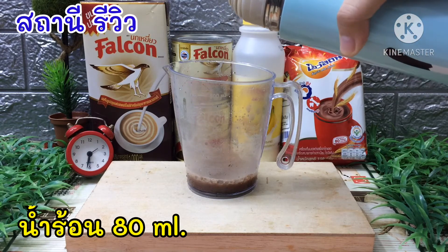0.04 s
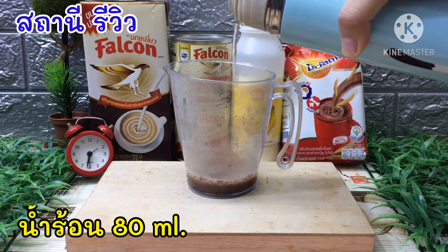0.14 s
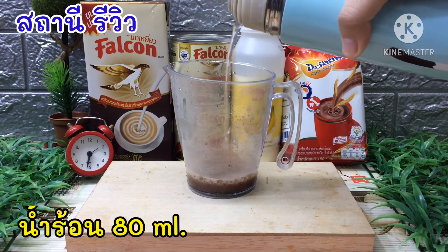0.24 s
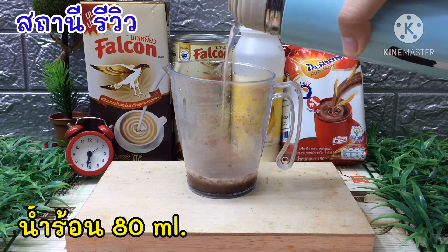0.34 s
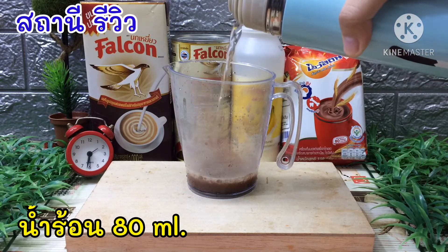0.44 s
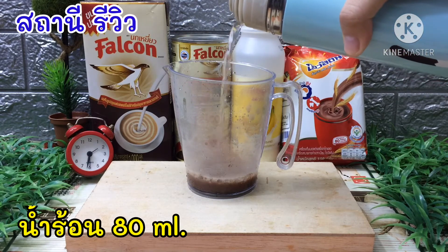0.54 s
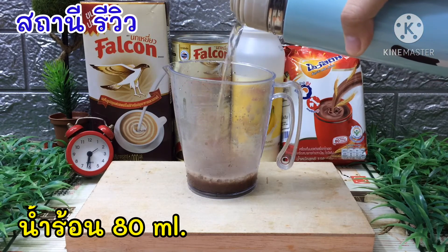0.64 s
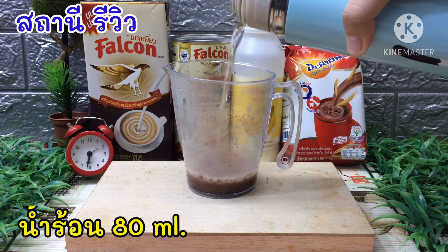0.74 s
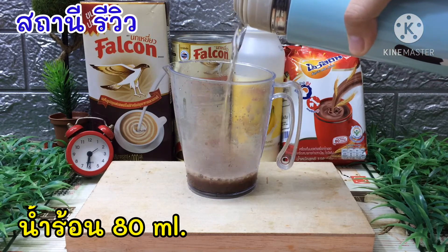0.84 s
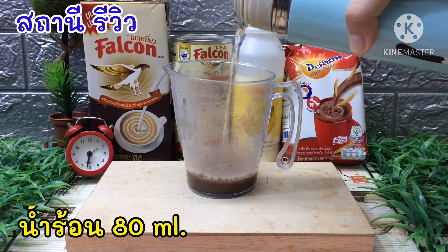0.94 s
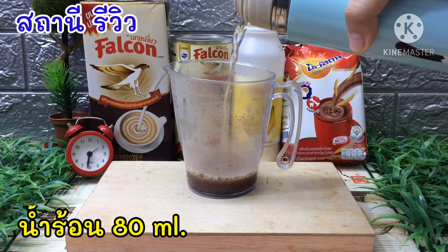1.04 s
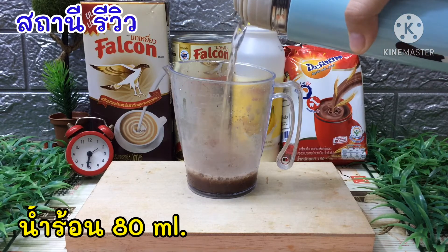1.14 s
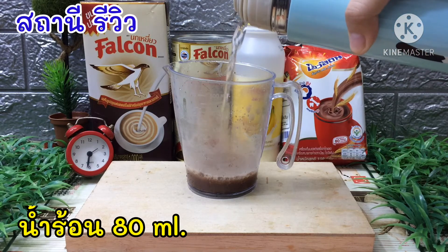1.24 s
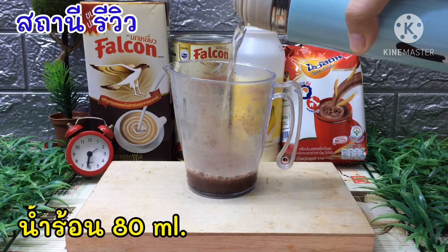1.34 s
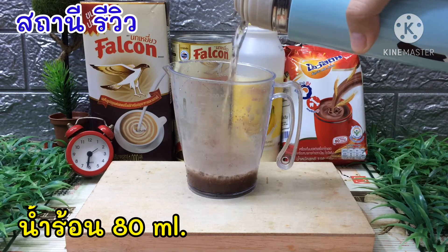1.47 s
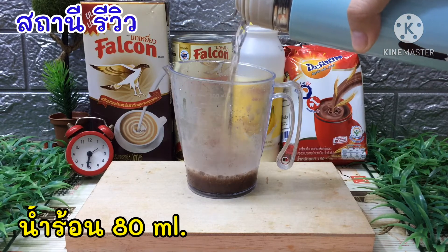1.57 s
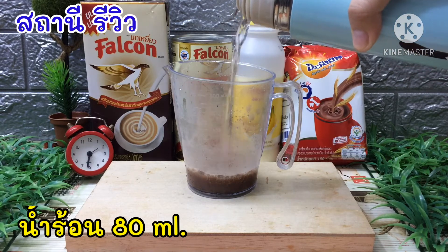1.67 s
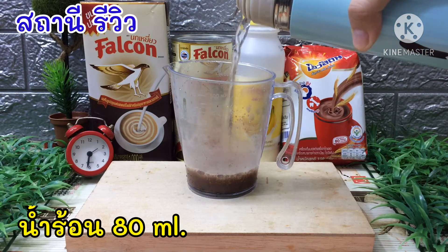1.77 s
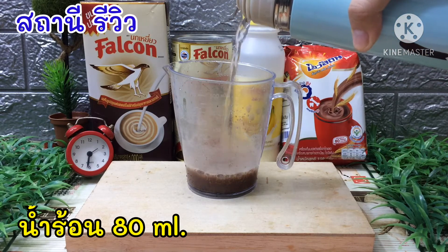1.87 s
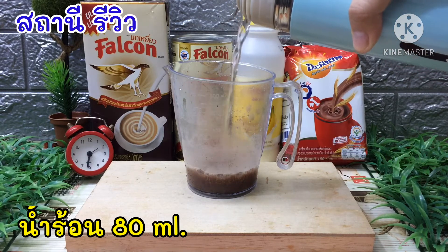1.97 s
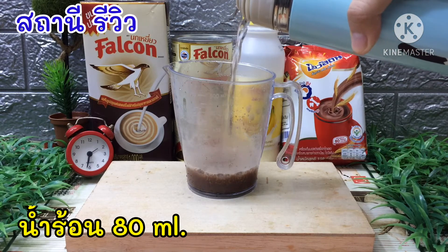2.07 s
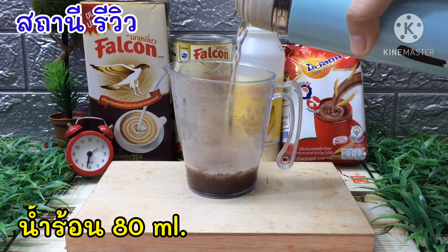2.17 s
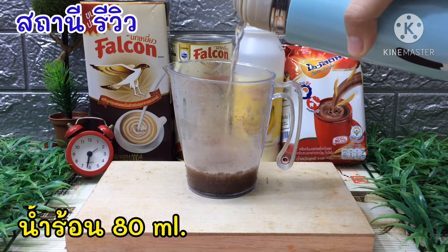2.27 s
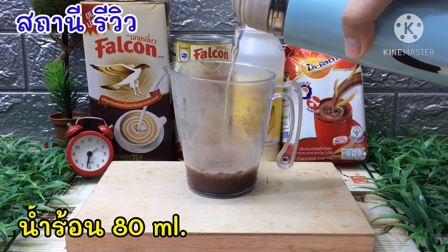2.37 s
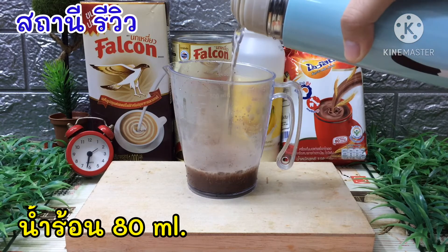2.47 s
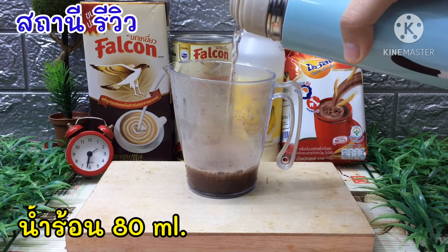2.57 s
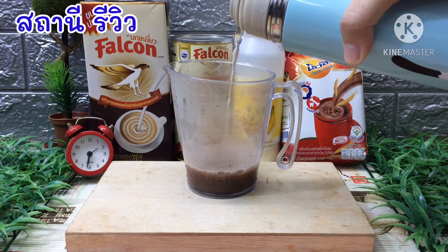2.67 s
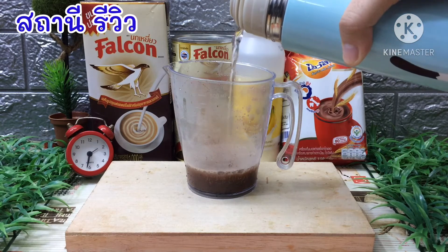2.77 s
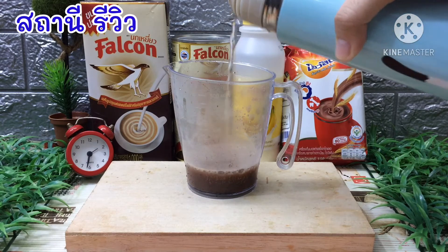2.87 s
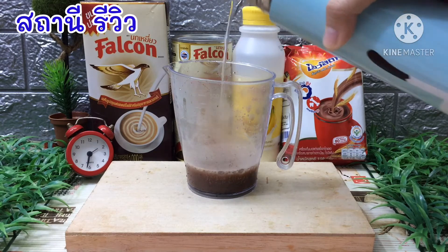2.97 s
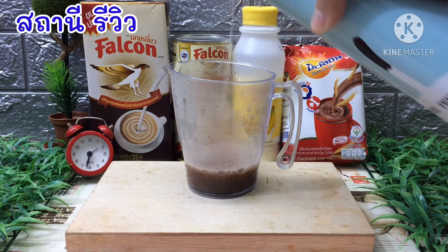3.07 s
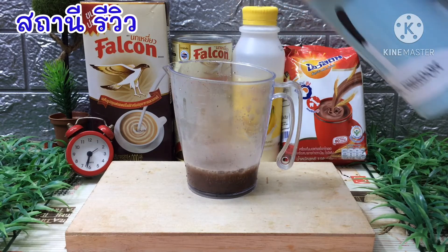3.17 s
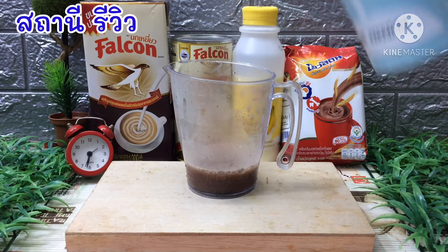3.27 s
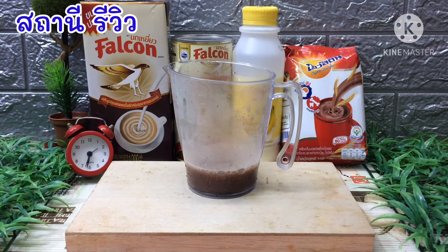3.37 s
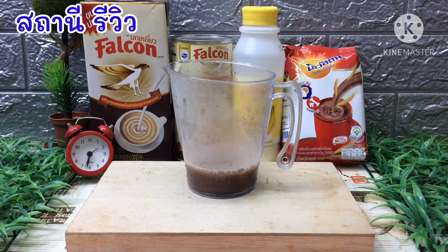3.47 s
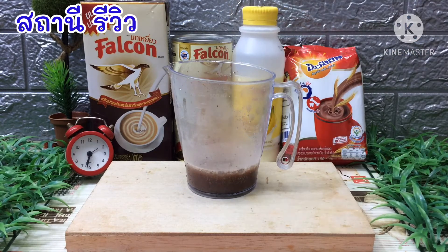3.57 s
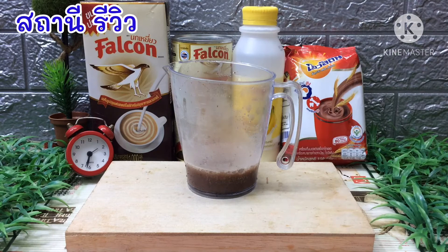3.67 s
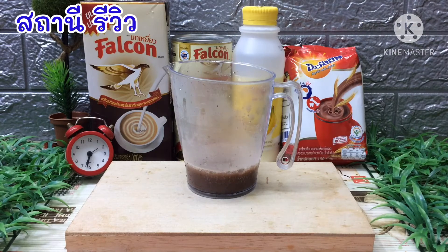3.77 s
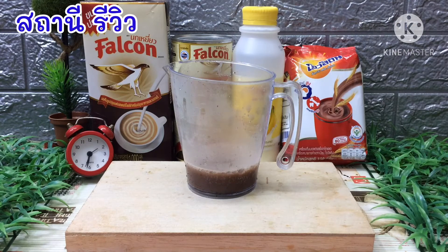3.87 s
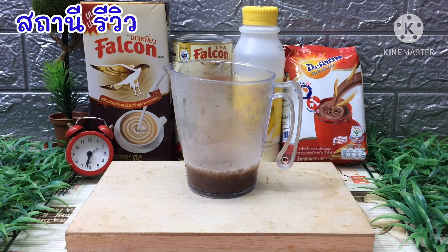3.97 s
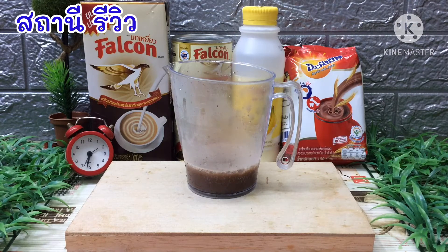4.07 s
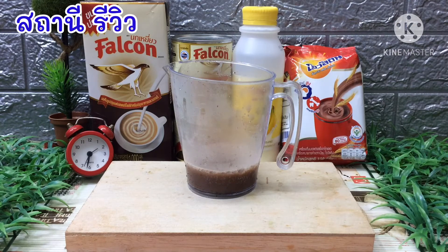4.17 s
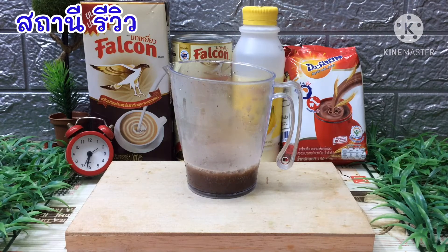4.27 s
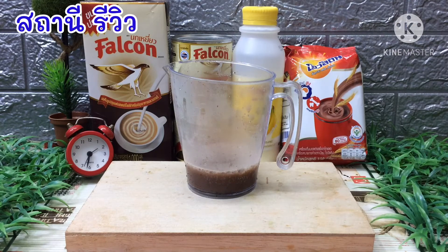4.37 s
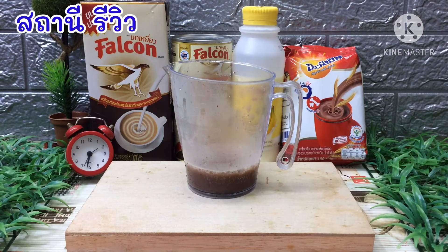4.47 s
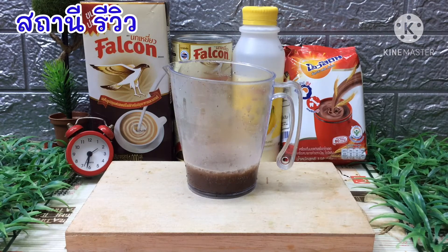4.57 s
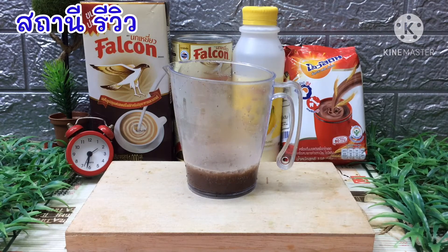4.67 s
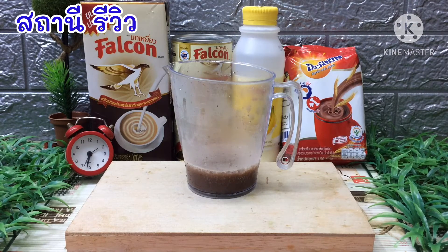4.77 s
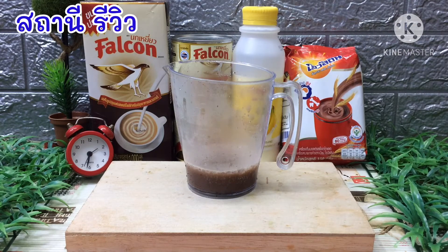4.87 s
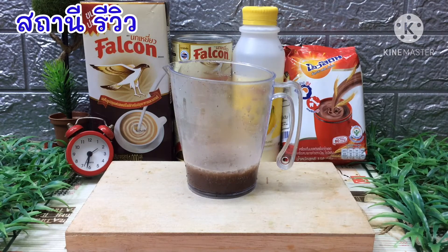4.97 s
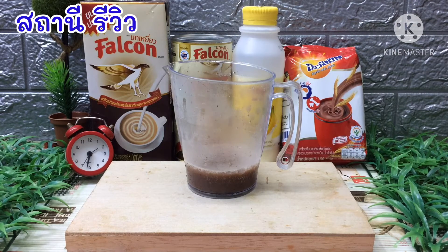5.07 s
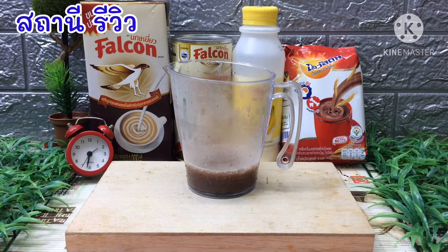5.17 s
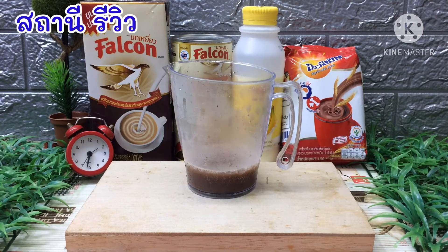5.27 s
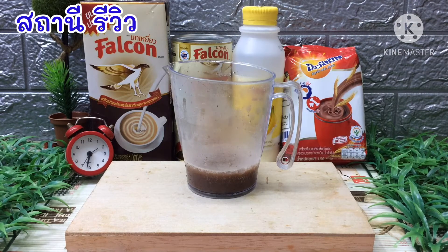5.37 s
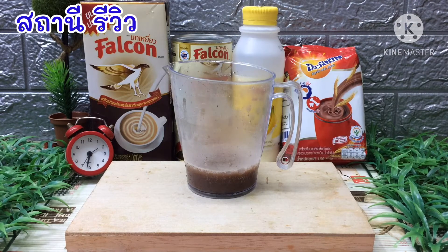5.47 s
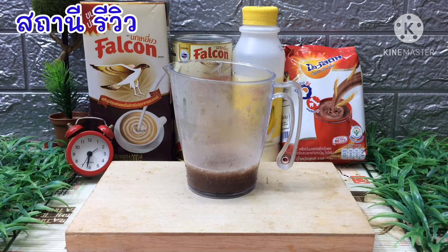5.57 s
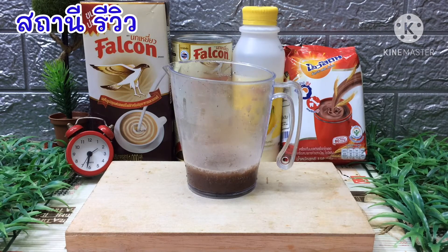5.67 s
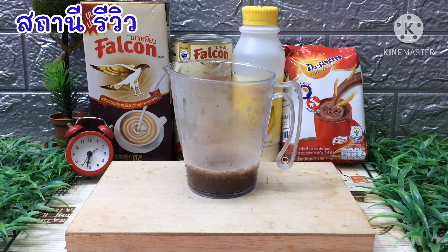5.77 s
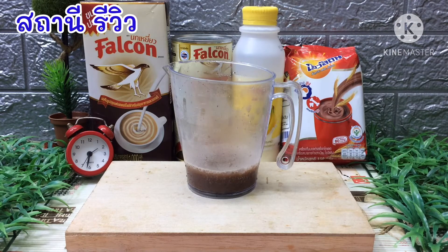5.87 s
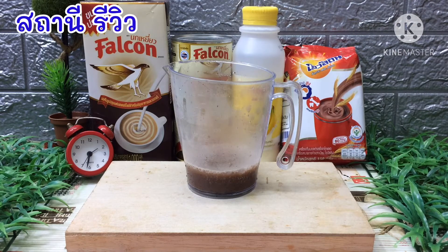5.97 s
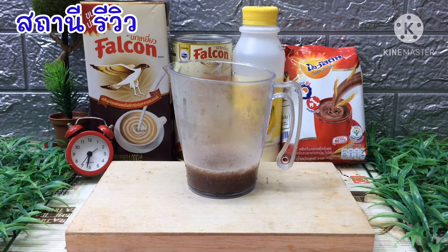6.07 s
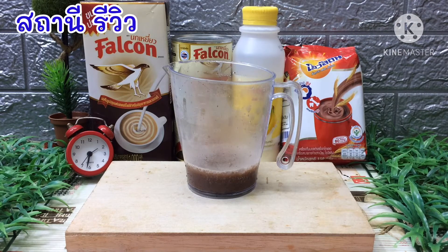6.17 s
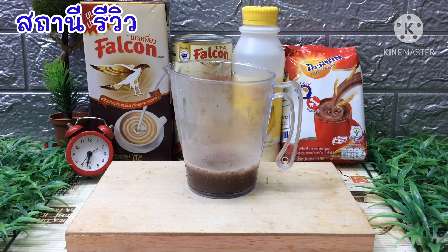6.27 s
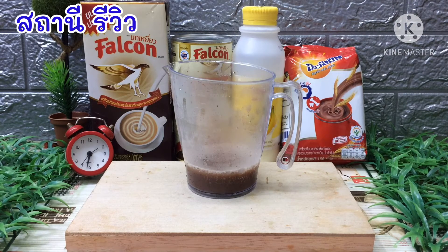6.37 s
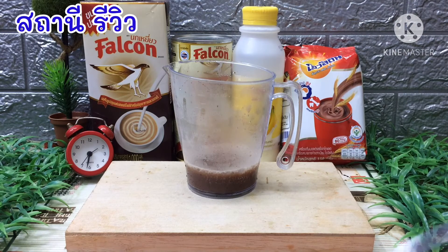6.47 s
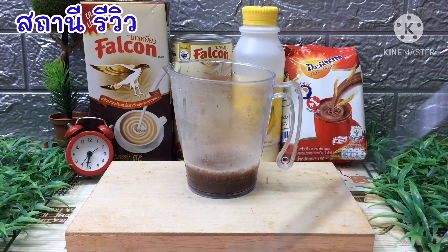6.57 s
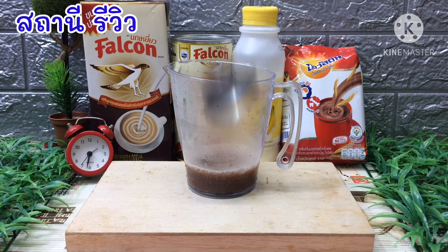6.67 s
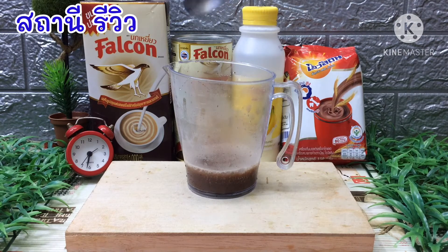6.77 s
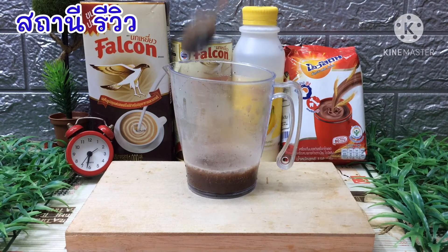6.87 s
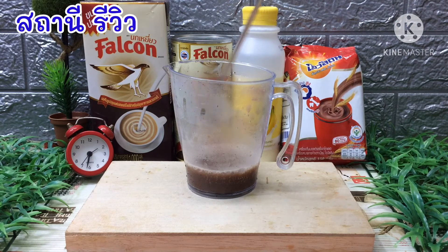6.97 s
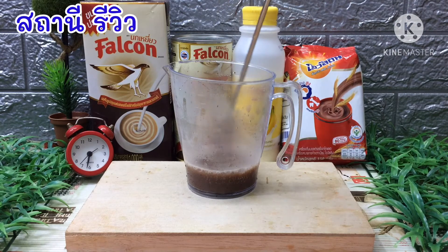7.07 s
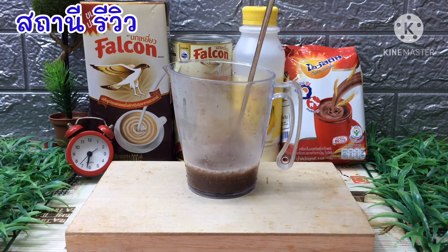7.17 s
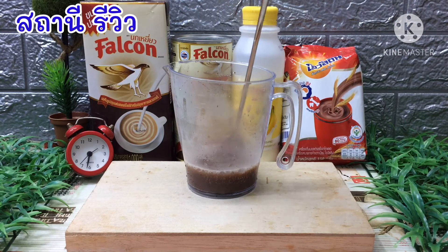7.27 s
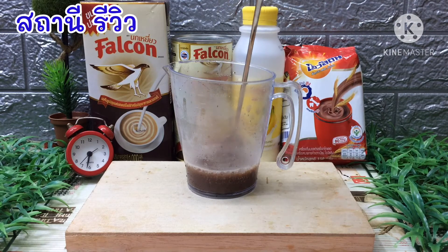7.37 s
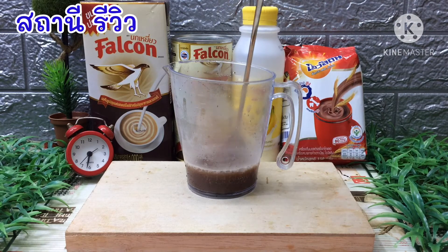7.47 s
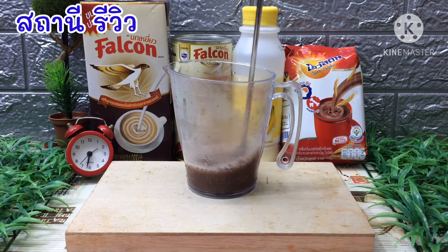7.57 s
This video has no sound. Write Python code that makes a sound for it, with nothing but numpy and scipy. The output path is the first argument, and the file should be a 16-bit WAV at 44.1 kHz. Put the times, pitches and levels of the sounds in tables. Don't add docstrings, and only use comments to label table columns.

```python
import sys
import numpy as np
from scipy import signal
from scipy.fft import rfft, irfft, next_fast_len
from scipy.io import wavfile
from scipy.ndimage import uniform_filter1d, map_coordinates

SR = 44100
rng = np.random.default_rng(int(sys.argv[2]) if len(sys.argv) > 2 else 0)


def digitize_waveform(pressure):
    field = np.atleast_2d(pressure).T
    bounded = np.clip(field, -1, 1)
    quanta = np.round(bounded * 32767).astype(np.int16)
    wavfile.write(sys.argv[1], SR, quanta)


def nominal_scale(level):
    x = np.asarray(level, float) / 20
    return 10 ** x


N = 336394


def unit(x):
    return x / np.sqrt(np.mean(x ** 2) + 1e-20)


def along(points, hz):
    f, v = np.transpose(points)
    return np.interp(np.log(hz + 1), np.log(f + 1), v)


def wobble(rate):
    knots = rng.standard_normal(int(N * rate / SR) + 4)
    return map_coordinates(knots, [np.arange(N) * rate / SR])


def filtered(x, response):
    m = next_fast_len(len(x) + 8192)
    return irfft(rfft(x, m) * response(np.fft.rfftfreq(m, 1 / SR)), m)[:len(x)]


def noise(spectrum, size=N):
    return unit(filtered(rng.standard_normal(size), lambda hz: nominal_scale(along(spectrum, hz))))


def resonant(x, modes):
    def response(f):
        total = 0
        for k, (centre, width, db) in enumerate(modes):
            total = total + (-1) ** k * nominal_scale(db) * 1j * f * width / (centre ** 2 - f ** 2 + 1j * f * width)
        return total
    return filtered(x, response)


def blips(s, db, hz, cycles, rise, size=900):
    turns = hz[:, None] * np.arange(size) / SR
    life = turns / cycles[:, None]
    tone = np.sin(2 * np.pi * turns * (1 + rise * np.minimum(life, 3)))
    rows = nominal_scale(db)[:, None] * tone * np.exp(-life) * (1 - np.exp(-2 * turns))
    at = (s * SR).astype(int)[:, None] + np.arange(size)
    return np.bincount(at.ravel(), rows.ravel(), N + SR)[:N]


def swarm(count, hz, spread, cycles, scatter_db, rise=0.023):
    pour_s = 3.6
    u, v, w = rng.random((count, 3)).T
    pitch = np.clip(hz * np.exp(spread * rng.standard_normal(count)), 200, 15000)
    db = scatter_db * np.minimum(-np.log(1 - v), 3)
    grains = blips(pour_s * u, db, pitch, cycles * (0.5 + w), rise=rise, size=400)
    return grains / np.sqrt(np.mean(grains[:int(pour_s * SR)] ** 2))


def gush(events, db, t60):
    kicks = np.bincount((events * SR).astype(int), nominal_scale(db), N)
    return signal.lfilter([1], [1, -nominal_scale(-60 / t60 / SR)], kicks)


def patchy(x, patchy_db):
    z = signal.stft(x, nperseg=256)[2]
    field = uniform_filter1d(rng.standard_normal(z.shape), size=8, axis=0)
    field = uniform_filter1d(field, size=8, axis=1)
    return signal.istft(z * nominal_scale(patchy_db * unit(field)), nperseg=256)[1][:N]


def dribble(rows, modes, weaker_db, after_db):
    s, db, hz, _ = np.transpose(rows)
    u, v, w = rng.random((len(s), 3)).T
    late = s + 0.013 + 0.006 * u
    weak = (db + db.mean()) / 2 + weaker_db + 3 * (2 * w - 1)
    pitch = np.array(modes)[(v * len(modes)).astype(int), 0]
    return np.hstack([np.transpose(rows), [late, weak, pitch, 0 * s + after_db]])


# (time [s], strength [dB])
FLOW = [(.28, -64), (.38, -49.5), (.62, -45.5), (1.8, -38.5), (2.2, -47), (2.9, -45.5), (3.19, -44.5),
        (3.34, -63), (3.45, -97)]


def pour():
    flow_s, flow_db = np.transpose(FLOW)
    gurgle_db = np.interp(np.arange(N) / SR, flow_s, flow_db, -120, -120)
    slapping, spatter = slaps(gurgle_db)
    bubbling = bubbles(gurgle_db - 14)
    spray_db = -59.5 + 0.86 * (gurgle_db + 44)
    return slapping + bubbling + spray(spray_db, spatter)


# (time [s], peak level [dB], pitch of the cavity [Hz], gush that follows [dB])
SLUGS = [(0.402, -20.5, 710, -12.5), (0.495, -16.5, 716, -12), (0.592, -18, 716, -23), (0.665, -25, 635, 1),
         (0.883, -19.5, 716, 0), (1.05, -18, 740, -13), (1.1185, -24.5, 760, 0.5), (1.169, -22.5, 600, -1),
         (1.331, -17, 720, -7.5), (1.4055, -12.5, 695, -9.5), (1.487, -19.5, 553, -14),
         (1.677, -29.5, 740, 11.5), (1.873, -18.5, 740, -1), (1.911, -19, 1080, -6.5),
         (1.9375, -15, 754, -10), (2.028, -13.5, 1047, -31), (2.09, -15, 754, -5), (2.14, -19, 500, 2.5),
         (2.243, -18, 563, 1), (2.285, -19, 465, 0), (2.32, -17, 490, -21), (2.41, -16.5, 1150, -6.5),
         (2.574, -21.5, 760, 0), (2.6625, -17, 774, -1.5), (2.72, -12.5, 760, -22), (2.85, -19, 754, 1.5),
         (2.946, -14.5, 790, -7.5), (3.045, -22, 760, -4), (3.084, -10.5, 760, -9), (3.119, -35, 560, -9),
         (0.537, -17, 665, -14), (0.754, -23.5, 600, -16), (0.807, -20.5, 624, -31), (0.959, -24, 611, -25),
         (0.996, -24.5, 766, 0), (1.267, -21.5, 725, -11), (1.385, -34, 538, -23), (1.525, -33, 760, 2),
         (1.584, -42, 727, -24), (1.787, -26, 760, -22), (1.849, -18.5, 1005, -28),
         (2.153, -13, 553, -11.5), (2.217, -25, 517, -9), (2.425, -17, 800, -4.5), (2.463, -32, 590, -12),
         (2.525, -29, 534, -2), (2.675, -19, 790, -19), (2.818, -21, 754, -12), (2.921, -29, 770, -16),
         (3.063, -26, 815, -21)]
# (frequency [Hz], width [Hz], level [dB])
JUG_AIR = [(199, 22, -9), (312, 34, -7.5), (447, 100, -6), (560, 64, 1.5), (760, 67, 1), (1033, 220, -6.5),
           (1288, 170, -10), (1850, 65, -41), (2300, 450, -6.5)]


def slaps(gurgle_db):
    s, db, hz, gush_db = dribble(SLUGS, modes=JUG_AIR[3:6], weaker_db=-10.5, after_db=-42)
    slap = blips(s, db, 0 * s + 1300, 0 * s + 0.5, rise=0, size=200)
    cavity = blips(s, db, hz, 2 + 3 * rng.random(len(s)), rise=0.014, size=1600)
    slugs = nominal_scale(12.0) * resonant(slap, JUG_AIR) + nominal_scale(-13.5) * slap + nominal_scale(-6.5) * cavity
    grains = swarm(count=2000, hz=976, spread=0.552, cycles=1.27, scatter_db=1.0)
    churn = nominal_scale(gurgle_db - 7.0) + gush(s, db + gush_db - 18.5, t60=0.29)
    gurgle = churn * unit(resonant(grains, JUG_AIR))
    spatter = gush(s, db - 38.0, t60=0.022)
    return slugs + gurgle, spatter


# (time [s], peak level [dB], pitch [Hz], froth that follows [dB])
BUBBLES = [(0.3836, -36.5, 2300, -10.5), (0.5114, -27, 1870, -14), (0.5742, -25, 1870, -13),
           (0.7184, -25.5, 2600, -9), (0.883, -23, 1970, -18), (0.9329, -23.5, 2270, -15.5),
           (1.1185, -24, 2270, -22.5), (1.1344, -12.5, 2270, -23), (1.1948, -27, 2270, -11),
           (1.2675, -35, 2380, -8), (1.3325, -29, 1880, -24), (1.4218, -32, 2400, -14),
           (1.5096, -28, 2680, -17), (1.5739, -22.5, 1870, -35), (1.6767, -12, 2460, -29),
           (1.7211, -17.5, 2230, -18), (1.8503, -18, 2620, -20), (1.8748, -15.5, 2250, -34),
           (2.0279, -20.5, 2270, -42), (2.1865, -20, 2210, -40), (2.2838, -21, 2300, -33),
           (2.4105, -21.5, 2320, -16), (2.5083, -20.5, 2120, -21.5), (2.5971, -13, 2270, -56),
           (2.7228, -21, 1870, -17.5), (2.8186, -23, 2270, -17), (2.85, -14, 2240, -26),
           (2.9189, -19.5, 1720, -16), (3.084, -23, 2300, -16), (3.1738, -24, 2600, -31),
           (0.4895, -40, 1760, -20), (0.6556, -37, 2670, -10), (0.7439, -22, 2600, -21),
           (0.9954, -32, 2260, -20), (1.0363, -31, 1940, -12), (1.0717, -27, 2430, -29),
           (1.3805, -26, 2520, -22), (1.4872, -24.5, 1850, -26), (1.6309, -25, 1920, -20),
           (1.7023, -24, 2620, -28), (1.9372, -38, 2370, -24), (1.9731, -29, 2390, -25),
           (2.0006, -43, 1920, -28), (2.1398, -25, 1910, -15.5), (2.3792, -24.5, 1920, -20),
           (2.4625, -27, 2380, -14), (2.6626, -30, 2170, -26), (2.8043, -24, 2170, -31),
           (2.8906, -20, 2300, -32), (3.0617, -25, 2270, -18.5)]
# (time [s], peak level [dB], pitch [Hz])
DRIPS = [(1.738, -26, 2400), (1.752, -23, 2250), (1.938, -34, 2290), (3.135, -32, 2240),
         (3.154, -32, 2730), (3.156, -35, 3370), (3.248, -36.5, 1090), (3.25, -39, 560),
         (2.9937, -34, 3500), (3.0225, -27, 2280), (3.153, -26.5, 806), (3.202, -35, 1790),
         (3.219, -35, 2400), (3.262, -37, 1850), (3.295, -33.5, 1110), (3.315, -43, 1120),
         (3.412, -51, 1560)]
# (frequency [Hz], width [Hz], level [dB])
MOUTH = [(1510, 560, -11), (1870, 116, -2), (2270, 107, 0.5), (2620, 130, 1.5), (3300, 1000, -9.5)]


def bubbles(bubbling_db):
    s, db, hz, froth_db = dribble(BUBBLES, modes=MOUTH[1:4], weaker_db=-27, after_db=-23.5)
    single = nominal_scale(-5.5) * blips(s, db, hz, 3.9 + 3 * rng.random(len(s)), rise=0.02)
    drip_s, drip_db, drip_hz = np.transpose(DRIPS)
    drips = blips(drip_s, drip_db, drip_hz, 0 * drip_s + 4, rise=0.0066)
    ticks = swarm(count=1500, hz=2200, spread=0.36, cycles=1.6, scatter_db=4)
    plinks = swarm(count=450, hz=2100, spread=0.33, cycles=3, scatter_db=2.5, rise=0.06)
    froth = unit(resonant(ticks, MOUTH)) + nominal_scale(-9) * plinks
    level = nominal_scale(bubbling_db + 0.4 * wobble(31.8)) + gush(s, db + froth_db, t60=0.06)
    return single + drips + level * froth


# (time [s], peak level [dB], centre [Hz])
SPRAY = [(0.399, -29, 4040), (0.547, -26.5, 8500), (0.683, -26, 7240), (0.719, -31, 7070),
         (0.736, -27.5, 7000), (0.53, -24.5, 3300), (0.9323, -34, 7840), (1.85, -29, 3300),
         (1.127, -31, 3300), (0.77, -25.5, 4120), (0.874, -37, 3970), (1.736, -20.5, 4000),
         (2.705, -38, 3600), (2.997, -24.5, 3700), (3.062, -31, 3600), (3.22, -33, 4200),
         (1.072, -26.5, 5500), (1.124, -29.5, 7100), (1.207, -34, 7750), (1.255, -26.5, 5600),
         (1.332, -27, 8750), (1.414, -28, 4480), (1.509, -25.5, 4050), (1.5733, -30, 9300),
         (1.6837, -25, 6850), (1.722, -31, 7050), (1.75, -19.5, 5840), (2.0716, -24, 7200),
         (2.2583, -27.5, 7540), (2.285, -25, 7000), (2.383, -30.5, 7200), (2.452, -27.5, 5200),
         (2.504, -35, 9900), (2.6, -27.5, 9100), (2.884, -35, 6300), (2.9972, -24.5, 6360),
         (2.82, -53, 3400), (3.235, -30.5, 6860), (3.264, -31.5, 5000), (3.152, -39, 4500)]
# (frequency [Hz], level [dB per Hz])
FIZZ = [(1760, -63), (3000, 2), (4440, 2.5), (7150, 5.5), (7890, 1.5), (9600, -3.5), (14500, -0.5),
        (16000, -9)]
# (time [s], peak level [dB])
PRICKS = [(0.4002, -42), (0.5289, -54), (0.5474, -47), (0.5918, -40), (0.6232, -39), (0.6816, -49),
          (0.719, -37), (0.7644, -43), (0.8753, -37), (0.931, -44), (0.945, -33.5), (1.0358, -39),
          (1.0707, -47), (1.1181, -39), (1.1859, -47), (1.207, -33), (1.2553, -35), (1.3316, -44),
          (1.368, -42), (1.4214, -43), (1.4478, -40), (1.4872, -35), (1.525, -38), (1.575, -37),
          (1.6135, -45), (1.65, -39), (1.722, -22), (1.7514, -24), (1.8739, -50), (2.028, -38),
          (2.073, -45), (2.0907, -32), (2.26, -37), (2.3822, -41), (2.4613, -32), (2.5055, -34.5),
          (2.598, -38), (2.6252, -48), (2.705, -41), (2.7555, -38), (2.8835, -35), (2.9185, -44),
          (2.9973, -48), (3.062, -35), (3.152, -46), (3.1734, -37), (3.219, -43), (3.2363, -36)]
# (frequency [Hz], level [dB per Hz])
PRICK = [(2500, -40), (5000, 1), (8000, 7.5), (13500, 5.5), (16000, -1.5)]


def spray(spray_db, spatter):
    fizz = noise(FIZZ) + 0.6 * swarm(count=5000, hz=7000, spread=0.5, cycles=3.5, scatter_db=4.5)
    out = (nominal_scale(spray_db - 3.0 + 3.2 * wobble(22.47)) + spatter) * fizz
    t = np.arange(SR // 4) / SR
    dying = nominal_scale(-17.5 - 60 * t / 0.0068) + nominal_scale(-19.5 - 60 * t / 0.13)
    for s, db, hz in SPRAY:
        top_db = -20 + (db + 14.5)
        colour = [(1200, -40), (hz / 1.58, -10), (hz, 0), (hz * 1.09, -8), (16000, top_db)]
        out[round(s * SR):][:len(t)] += nominal_scale(db) * dying * noise(colour, size=len(t))
    t = t[:3000]
    dying = nominal_scale(-9.0 - 60 * t / 0.0086) + nominal_scale(-17.5 - 60 * t / 0.12)
    for s, db in PRICKS:
        out[round(s * SR):][:len(t)] += nominal_scale(db) * dying * noise(PRICK, size=len(t))
    return patchy(out, patchy_db=2.5)


def struck(blows, modes, colour, ring_db, crack_db, crack_t60, attack=0.00056, rough_db=3, detune=0,
           size=SR // 2):
    out, t = np.zeros(N + SR), np.arange(size) / SR
    knots = np.arange(0, 0.51, 0.012)
    for s, db in blows:
        ring = 0
        for hz, level, t60 in modes:
            strength = level + rng.normal(0, 1.0)
            sway = rng.standard_normal(len(knots)) * np.minimum(knots / 0.091, 1)
            fade = nominal_scale(strength - 60 * t / t60 + rough_db * np.interp(t, knots, sway))
            pitch = hz * (1 + detune * rng.standard_normal())
            ring = ring - fade * np.sin(2 * np.pi * pitch * t)
        crack = nominal_scale(crack_db - 60 * t / crack_t60) * noise(colour, size=len(t))
        onset = 1 - np.exp(-t / attack)
        out[round(s * SR):][:len(t)] += nominal_scale(db) * (nominal_scale(ring_db) * ring + crack) * onset
    return out[:N]


# (time [s], peak level [dB])
FLASK_BLOWS = [
    (4.6141, -12),
]
# (time [s], peak level [dB])
ROCKING = [
    (4.662, -14.5),
    (4.697, -31),
]
# (frequency [Hz], level [dB], t60 [s])
TABLE = [(147.5, -7.5, 0.44), (316, 12.5, 0.025), (170.5, -2.5, 0.25), (212, -8, 0.19), (277, -5, 0.14),
         (357, 5, 0.16), (446, 7, 0.12), (623, 3.5, 0.051), (754, -18, 0.2), (1013, 8, 0.032),
         (1190, 0, 0.13)]
# (frequency [Hz], level [dB], t60 [s])
FLASK = [(1379, -13, 0.45), (1434, -3, 0.26), (2606, -22, 0.22), (2789, -21, .22), (3585, -22, 0.24),
         (3725, -15, 0.07), (4125, -22, 0.26), (5330, -27, .2)]
# (frequency [Hz], level [dB per Hz])
THUD = [(59, -48), (110, -35), (180, 3.5), (462, -11), (594, -1.5), (1460, -9), (1770, -21.5), (2690, -23),
        (15000, -63)]
# (frequency [Hz], level [dB per Hz])
PAT = [(100, -26), (250, 13), (500, 2), (1100, -5), (2000, -49), (8000, -40)]


def flask():
    thump = struck(FLASK_BLOWS, TABLE, THUD, ring_db=-11.5, crack_db=-5.0, crack_t60=0.17,
                   attack=0.00072, rough_db=7.5)
    steel = struck(FLASK_BLOWS, FLASK, THUD, ring_db=-10.5, crack_db=-60, crack_t60=0.01,
                   attack=0.012, rough_db=1.2)
    rocking = struck(ROCKING, TABLE[:7], PAT, ring_db=-22.0, crack_db=-10.5, crack_t60=0.042)
    return thump + steel + rocking


# (time [s], peak level [dB])
LID_BLOWS = [
    (5.612, -51),
    (5.643, -22.5),
    (5.653, -27),
    (5.662, -25.5),
    (5.669, -32),
    (5.678, -28.5),
]
# (time [s], peak level [dB])
LID_SETTLES = [
    (5.697, -40),
    (5.709, -34.5),
    (5.726, -43),
    (5.745, -43),
    (5.762, -41.5),
    (5.822, -48),
]
# (frequency [Hz], level [dB], t60 [s])
LID = [(448, -5, 0.1), (600, -4, 0.23), (1610, -10, .08), (2600, -9, 0.042), (1260, -21, 0.13),
       (1920, 4, 0.11), (2195, 7.5, 0.078), (3050, 15, 0.036), (3510, 12, 0.026), (3940, -4, .05),
       (4140, 6.5, 0.03), (5900, -1, 0.042)]
# (frequency [Hz], level [dB], t60 [s])
LID_RIM = [(1304, 2, 0.059), (2050, -9, 0.046), (3520, 0, .05), (4170, 1, 0.07), (5300, -2, .05)]
# (frequency [Hz], level [dB per Hz])
SNAP = [(180, -61), (300, -29), (606, -11), (898, -4), (959, 0), (3120, -1.5), (3980, -5), (5710, -11),
        (15000, -35)]


def lid():
    click = struck(LID_BLOWS, LID, SNAP, ring_db=-15.0, crack_db=-6.0, crack_t60=0.071,
                   attack=0.0005, rough_db=-3, detune=0.0376, size=8000)
    rattle = struck(LID_SETTLES, LID_RIM, SNAP, ring_db=-9.5, crack_db=-7, crack_t60=0.038,
                    attack=0.0006, rough_db=11, detune=0.0205, size=5000)
    return click + rattle


# (time [s], peak level [dB])
SPOON_BLOWS = [
    (6.408, -44),
    (7.194, -18),
    (7.222, -35.5),
    (7.544, -50.5),
    (7.627, -47),
]
# (frequency [Hz], level [dB], t60 [s])
JUG_WALL = [(465, -3, 0.067), (531, -6, 0.1), (720, -6.5, 0.095), (935, 1, 0.036), (1142, -0.5, 0.081),
            (1213, -8, 0.071), (1560, 0, 0.043), (2100, -6, 0.057), (2620, -1.5, 0.056), (2665, -26, 0.26),
            (4110, 0, 0.023), (5460, -16, 0.1), (6960, -9.5, 0.04)]
# (frequency [Hz], level [dB per Hz])
TAP = [(150, -22), (250, -16.5), (459, -5.5), (1130, -3.5), (1840, -14.5), (2690, -9.5), (3370, -24.5),
       (4230, -14.5), (15800, -28.5)]


def spoon():
    return struck(SPOON_BLOWS, JUG_WALL, TAP, ring_db=-4, crack_db=-2.5, crack_t60=0.069, rough_db=-4)


# (middle [s], level [dB], half length [s], centre [Hz])
SCRAPE = [(0.138, -54.5, 0.0084, 2540), (4.139, -58, 0.018, 2400), (5.141, -59.5, 0.023, 2500),
          (5.631, -48, 0.011, 2470), (5.726, -45, 0.035, 2200), (5.83, -55, 0.032, 3520),
          (6.227, -40, 0.0099, 483), (6.145, -55, 0.011, 2200), (6.195, -40.5, 0.014, 4300),
          (6.216, -34.5, 0.0053, 1850), (6.322, -45, 0.0067, 3100), (6.333, -44, 0.005, 2450),
          (6.337, -51, 0.0039, 1800), (6.331, -41.5, 0.0074, 1100), (6.195, -51, 0.0086, 3000),
          (6.217, -49, 0.012, 5700), (6.302, -52, 0.012, 5600), (6.491, -44.5, 0.016, 1080),
          (6.552, -39, 0.0052, 2360), (6.556, -52, 0.015, 5200), (6.4, -52.5, 0.034, 2840),
          (6.446, -42.5, 0.0076, 3700), (6.514, -46, 0.041, 2740), (6.547, -39, 0.018, 3420),
          (6.559, -38.5, 0.0078, 1560), (6.593, -61, 0.012, 2500), (7.14, -57.5, 0.024, 2500),
          (7.566, -51, 0.023, 2510)]
# (frequency [Hz], width [Hz], level [dB])
STEEL = [(1107, 48, -1), (1405, 50, 3.5), (1938, 22, 4), (2360, 130, 1.5), (3080, 260, -5.5),
         (3800, 130, 3.5), (4350, 98, -6), (5140, 140, 0.5), (5860, 97, -2.5)]


def scrape():
    out, t = np.zeros(N + SR), np.arange(-SR // 10, SR // 10) / SR
    for s, db, half, hz in SCRAPE:
        colour = [(200, -26), (hz / 7.7, -14), (hz, 0), (hz * 1.54, -10), (16000, -21)]
        swell = np.exp(-(t / half) ** 2 / 2)
        crackle_db = 3.2 * np.repeat(rng.standard_normal(len(t) // 60 + 1), 60)[:len(t)] - 1
        grit = noise(colour, size=len(t)) * swell * nominal_scale(crackle_db)
        ring = resonant(grit, [(c, w, g + rng.normal(0, 0.89)) for c, w, g in STEEL])
        out[round(s * SR) - SR // 10:][:len(t)] += nominal_scale(db) * (0.28 * grit + ring)
    return out[:N]


# (time [s], peak level [dB], pitch [Hz])
GRIT = [(4.6162, 4, 306), (7.544, -37, 2700), (4.6139, -15, 1150), (4.6138, -33, 3830), (6.184, -48, 4120),
        (6.1857, -40, 3100), (6.1903, -43, 3900), (6.198, -39, 4400), (6.214, -43, 4350),
        (6.324, -30, 3050), (6.327, -35, 3400), (6.335, -32, 2370), (6.34, -37, 2000), (6.45, -39, 3600),
        (6.457, -39, 4000), (6.486, -39, 3500), (6.5253, -33, 2400), (6.5389, -33, 3940),
        (6.5477, -29, 2430), (6.553, -33, 3640)]


def crumbs():
    s, db, hz = np.transpose(GRIT)
    return blips(s, db - 0.5, hz, 3.3 * hz / 3000, rise=-0.012)


# (time [s], peak level [dB])
SOFT_BLOWS = [
    (3.636, -40.5),
    (6.464, -27),
]


def pats():
    modes = [(340, 11.7, 0.0031), (760, 7.0, 0.0059)]  # (frequency [Hz], level [dB], t60 [s])
    return struck(SOFT_BLOWS, modes, PAT, ring_db=-0.5, crack_db=1.5, crack_t60=0.022,
                  attack=0.00079, size=4000)


# (frequency [Hz], t60 [s])
ROOM = [(150, 0.57), (500, 0.2), (2000, 0.22), (10000, 0.26)]


def room(x):
    hz, t, z = signal.stft(rng.standard_normal(SR // 2), SR, nperseg=256)
    tail = signal.istft(z * nominal_scale(-60 * t / along(ROOM, hz)[:, None]), SR, nperseg=256)[1]
    return signal.fftconvolve(np.pad(x, (200, 0)), tail / np.linalg.norm(tail))[:N]


# (frequency [Hz], level [dB per Hz])
RUMBLE = [(7.1, -18), (12, 8.5), (35, -2.5), (60, -4.5), (75, -23.5), (87, -13), (113, -18), (145, -16.5),
          (219, -30), (277, -44.5), (400, -33.5), (520, -39), (880, -120)]
# (frequency [Hz], level [dB per Hz])
HISS = [(120, -51), (200, 0), (328, -2.5), (424, -9), (647, -5), (1840, -16.5), (2250, -17.5), (6170, -23),
        (15100, -23.5), (16000, -33)]
# (middle [s], level [dB], half length [s])
DRONE = [(0.12, -50.5, 0.052), (0.6, -63, 0.082), (1.59, -54.5, 0.1), (2.14, -56, 0.049), (3.5, -72, 0.05),
         (4.857, -37, 0.025), (4.91, -35, 0.007), (5.3, -66, 0.22), (6.23, -50, 0.12), (6.5, -50.5, 0.063),
         (6.852, -50, 0.1), (7.41, -52.5, 0.15), (7.597, -65, 0.048)]


def air():
    t = np.arange(N) / SR
    swell = sum(nominal_scale(db) * np.exp(-((t - s) / half) ** 2 / 2) for s, db, half in DRONE)
    drone_hz = 143 + 5 * wobble(7.4)
    drone = np.sqrt(2) * np.sin(2 * np.pi * np.cumsum(drone_hz) / SR)
    hiss = nominal_scale(-59 + 0.3 * wobble(1.14)) * noise(HISS)
    return nominal_scale(-38.5) * noise(RUMBLE) + swell * drone + hiss


def scene():
    water = pour()
    things = flask() + lid() + spoon() + pats() + crumbs() + scrape()
    echoes = room(nominal_scale(-7.0) * water + nominal_scale(-8.5) * things)
    return (water + things + echoes + air())[None]


def band_limit(x):
    return signal.sosfilt(signal.butter(12, 16520, fs=SR, output="sos"), x)


def record(dry):
    mix = filtered(dry[0], lambda hz: np.clip((15930 - hz) / 40, 0, 1))[None]
    return band_limit(mix)


dry = scene()
out = record(dry)
digitize_waveform(out)
```